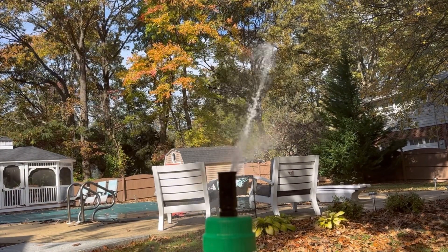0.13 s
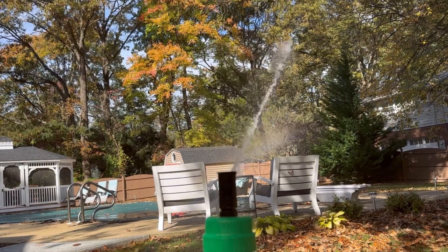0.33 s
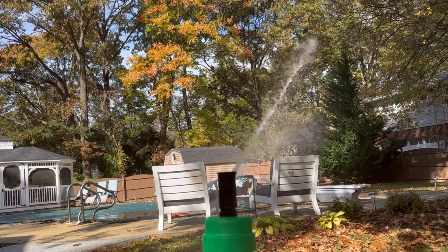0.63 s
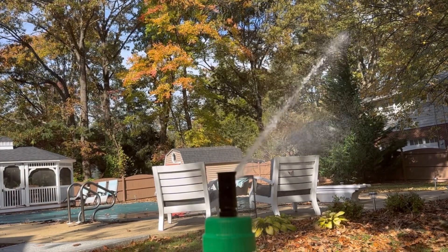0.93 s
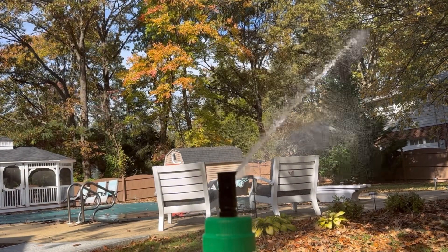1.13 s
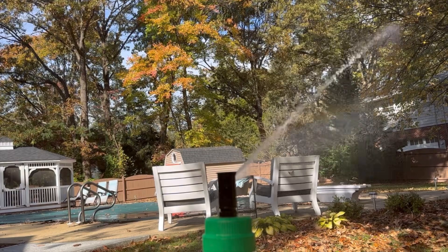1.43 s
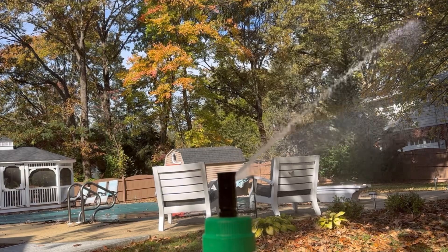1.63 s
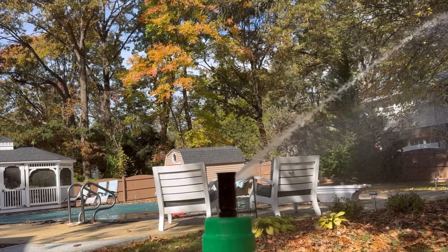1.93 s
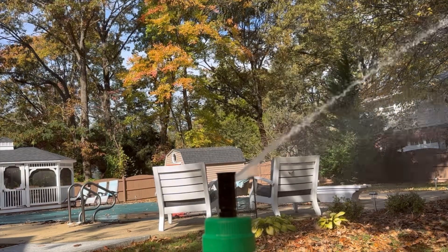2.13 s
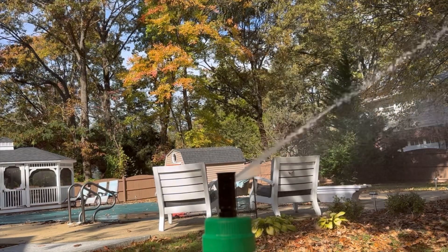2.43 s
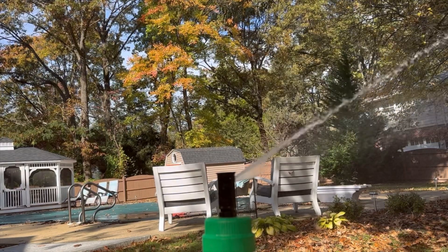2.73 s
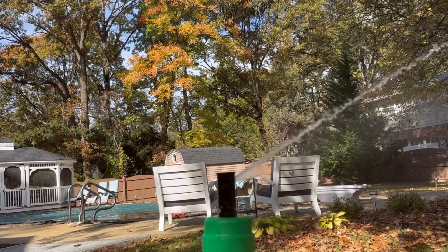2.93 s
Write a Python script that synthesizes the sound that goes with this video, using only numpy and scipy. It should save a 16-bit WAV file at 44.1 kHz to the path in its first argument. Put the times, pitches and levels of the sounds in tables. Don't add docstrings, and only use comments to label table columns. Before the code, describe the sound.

Close, steady sprinkler hiss with a fast fine throb fills an open yard, picked up in stereo by a phone; soft traffic wash fades early, a distant engine note drops midway, and leaf droplets tick more later.

```python
import sys
import numpy as np
from scipy import signal
from scipy.fft import rfft, irfft
from scipy.io import wavfile
from scipy.ndimage import uniform_filter1d

SR = 44100
rng = np.random.default_rng(int(sys.argv[2]) if len(sys.argv) > 2 else 0)


def file_out(sig):
    cols = np.atleast_2d(sig).T
    lim = np.clip(cols, -1, 1)
    pcm = np.round(lim * 32767).astype(np.int16)
    wavfile.write(sys.argv[1], SR, pcm)


def how_loud(loudness_db):
    steps = np.asarray(loudness_db, float) / 20
    return 10 ** steps


N = 135387

# [start_s, level_db]
ROAD_DB = [
    (0, 1.5),
    (.15, 0),
    (.6, -0.5),
    (1.05, 1),
    (1.3, -10.5),
    (1.9, -9),
    (3.07, -8.5),
]


def curve(table, col=1):
    points = np.array(table)
    return np.interp(np.arange(N) / SR, points[:, 0], points[:, col])


def bin_hz():
    return np.arange(N // 2 + 1) * SR / N


def over_hz(table):
    points = np.array(table)
    return np.interp(np.log(np.maximum(bin_hz(), 1)), np.log(points[:, 0]), points[:, 1])


def walk(rate_hz):
    hold = int(SR / rate_hz)
    steps = np.repeat(rng.standard_normal(N // hold + 1), hold)
    slewed = uniform_filter1d(uniform_filter1d(steps, hold), hold)
    return 1.31 * slewed[:N]


def ports(shared, own):
    # [freq_hz, likeness_0_to_1]
    likeness = [(60, 0.89), (300, 0.92), (800, 0.2), (2000, 0.84), (5000, 0.42), (6600, 0.59), (8000, 0.94),
                (14500, 0.53)]
    # [freq_hz, lead_rad]
    lead = [(2000, 0.5), (3600, 1.9), (5200, 1.08), (6650, 0.76), (8170, 3), (10400, 0.5), (13600, 1.7),
            (16000, -4.5)]
    # [freq_hz, tilt_db]
    tilt = [(60, 4.5), (600, 0.3), (1500, .5), (2400, -2.5), (3300, -0.5), (4800, 4), (7800, 3), (10000, 0)]
    common = np.clip(over_hz(likeness), 0, 1)
    half = how_loud(over_hz(tilt) / 2) * np.exp(0.5j * over_hz(lead))
    mixed = np.sqrt(common) * rfft(shared) + np.sqrt(1 - common) * rfft(own)
    return mixed * np.array([half, 1 / half])


def patter(share):
    drops_per_s, spread_db, cap_db, drop_s = 350, 1.5, 11, 0.00065
    chance, luck = rng.random((2, N))
    drop_db = np.minimum(-spread_db * np.log(luck + 1e-9), cap_db)
    hits = (chance < drops_per_s / SR) * how_loud(drop_db)
    grains = signal.lfilter([1], [1, -np.exp(-1 / (drop_s * SR))], hits)
    return np.sqrt(1 - share + share * grains ** 2 / np.mean(grains ** 2))


def wash(spectrum, shared_db, flicker_db, rate_hz, broad=0, pitched=0, count=2):
    # [freq_hz, width_hz, boost_db]
    nozzle = [(1320, 50, 1), (2460, 58, 2), (3374, 210, 5.5), (4250, 150, 3), (5270, 190, 5),
              (9350, 430, 2)]
    hz = bin_hz()
    white = rng.standard_normal((3, N))
    if broad:
        white = white * patter(broad)
    ring_db = sum(db / (1 + (2 * (hz - f) / width) ** 2) for f, width, db in nozzle)
    inside = (hz > spectrum[0][0]) & (hz < spectrum[-1][0])
    coloured = ports(white[0], white[1:]) * how_loud(over_hz(spectrum) + ring_db) * np.sqrt(SR / 2) * inside
    place = count * np.log2(np.maximum(hz, 1) / spectrum[0][0])
    out = 0
    for k in range(int(place[inside].max()) + 2):
        band = np.cos(np.pi / 2 * np.clip(place - k, -1, 1)) ** 2
        part = irfft(coloured * band, N) * how_loud(shared_db + flicker_db * walk(rate_hz))
        if pitched:
            part = part * patter(pitched)
        out = out + part
    return out


def sprinkler():
    # [freq_hz, density_db_per_hz]
    jet_colour = [(1500, -100), (2900, -94.5), (3700, -92.5), (4300, -92.5), (5000, -95), (6000, -94.5),
                  (6700, -99), (8700, -100)]
    # [freq_hz, density_db_per_hz]
    spray_colour = [(6600, -104), (7550, -91.5), (9100, -87.5), (9800, -92), (11000, -89.5), (13500, -92.5),
                    (14500, -95.5), (16000, -91.5)]
    # [start_s, level_db, left_lead_samples]
    swing = [(0, 0, .04), (.3, 0, .02), (.45, -.5, 0.12), (.6, 0, 0.01), (.75, 0, .14), (1.0, -0.5, .03),
             (1.2, .2, 0.079), (1.4, 0.4, -0.11), (1.7, -0.5, -0.085), (2.3, 0.04, -0.07), (2.7, 1, -0.079),
             (3.07, 1.5, -0.11)]
    turbine_hz, throb_depth_db = 65.8, 1.27
    turn = 2 * np.pi * np.cumsum(turbine_hz * (1 + 0.0022 * walk(4.6))) / SR
    throb = throb_depth_db * (np.sin(turn) + 0.36 * np.sin(2 * turn))
    gust, flutter = walk(7.3), walk(25.13)
    swing_db = curve(swing)
    jet_db = 1.65 * swing_db + 0.63 * throb + 0.3 * gust + 0.55 * flutter
    spray_db = swing_db + throb + 0.098 * gust + 0.17 * flutter
    jet = wash(jet_colour, jet_db, 0.4, 14, broad=0.026, pitched=0.1)
    spray = wash(spray_colour, spray_db, 0.52, 20, broad=0.1, pitched=0.2, count=4)
    both = jet + spray
    drift = curve(swing, col=2) + 0.03 * walk(13)
    return both + np.array([[1], [-1]]) * drift * np.gradient(both, axis=1) / 2


def splashes():
    # [start_s, peak_db, low_hz, high_hz, length_s]
    hits = [(.0149, -51, 9000, 13000, .002), (.0742, -51, 9000, 13000, .002),
            (.1336, -52, 4000, 13000, .003), (.3882, -53, 4000, 13000, .003),
            (.403, -48, 8300, 10500, .002), (.5232, -52, 3500, 13000, .003), (1.3578, -46, 700, 2500, .003),
            (1.3578, -49, 2500, 7500, .002), (1.4396, -51, 8300, 10500, .002),
            (1.8647, -47, 8500, 12000, .002), (1.9325, -48, 1200, 6500, .0025),
            (1.9335, -47, 8300, 13000, .004), (2.1246, -46, 7500, 13000, .004),
            (2.172, -48, 8500, 12000, .002), (2.1894, -48, 9000, 12500, .002),
            (2.3615, -49, 5000, 13000, .003), (2.5292, -49, 9000, 12000, .002),
            (2.6329, -49, 8300, 10500, .002), (2.668, -49, 11000, 13500, .004),
            (2.677, -44, 8500, 13000, .004), (2.686, -49, 10500, 13000, .004),
            (2.7297, -49, 6000, 11500, .003), (2.9632, -51, 1500, 8000, .002)]
    out = np.zeros((3, N))
    crack = 4.0 * (np.arange(1000) == 8)
    for at, db, low_hz, high_hz, length_s in hits:
        start = int(at * SR)
        age = np.arange(1000) / SR / length_s
        fizz = rng.standard_normal((3, 1000)) * np.minimum(age * 6, 1) * np.exp(-age)
        sos = signal.butter(2, [low_hz, high_hz], "band", fs=SR, output="sos")
        burst = signal.sosfilt(sos, fizz + crack)
        peak_rms = np.sqrt(np.mean(burst[:, age < 1] ** 2, axis=1, keepdims=True))
        out[:, start:start + 1000] += how_loud(db) * burst / peak_rms
    return irfft(ports(out[0], out[1:]), N)


def drone(hz, db, wobble, rough_db):
    phase = 2 * np.pi * np.cumsum(hz * (1 + wobble * walk(8.83))) / SR
    return np.sqrt(2) * np.sin(phase) * how_loud(db + rough_db * walk(15))


def truck():
    # [start_s, firing_hz, level_db]
    pull = [(0, 121.8, -45.5), (.17, 119.8, -47.5), (.22, 122, -59), (.29, 121.9, -58), (.36, 122.6, -45.5),
            (.62, 124.7, -38.5), (.85, 126.2, -40), (1.05, 127, -39.5), (1.66, 127.1, -39.5),
            (1.73, 122.2, -42.5), (1.77, 118, -41.5), (1.81, 109.6, -43), (1.855, 106, -36),
            (1.92, 101.1, -43), (1.98, 97.75, -33), (2.15, 97.8, -37.5), (2.29, 98.5, -50),
            (2.43, 98.9, -44), (2.53, 98.6, -48), (2.62, 99.8, -36), (2.8, 100.4, -59.5), (2.93, 99.5, -39),
            (3.07, 101, -76)]
    note = drone(curve(pull), curve(pull, col=2), 0.003, 0.8)
    return note * how_loud([[-0.3], [0.3]])


def compressor():
    # [start_s, level_db]
    hum_db = [(0.0, -39.5), (.12, -42.5), (.5, -44.5), (.58, -39.5), (0.85, -37.5), (.95, -45), (.99, -56),
              (1.03, -37), (1.14, -40), (1.24, -51), (1.32, -42), (1.38, -66), (1.46, -46), (1.56, -52),
              (1.61, -48), (1.68, -57), (1.73, -44), (1.85, -42), (2.22, -37.5), (2.29, -41.5), (2.43, -37),
              (2.5, -45), (2.62, -46), (2.77, -55), (2.86, -52), (2.94, -41.5), (2.98, -47), (3.07, -42)]
    hum_hz = 61.04
    hum = drone(hum_hz, curve(hum_db), 0.002, 0.7)
    fourth = drone(4 * hum_hz, -63 + 0.12 * curve(ROAD_DB), 0.012, 2.5)
    return (hum + fourth) * how_loud([[0.2], [-0.2]])


def road():
    # [freq_hz, density_db_per_hz]
    road_colour = [(140, -90), (260, -75), (400, -85.5), (800, -83.5), (1100, -90)]
    return wash(road_colour, curve(ROAD_DB), 2.2, 5)


def yard():
    # [freq_hz, density_db_per_hz]
    yard_colour = [(25, -85), (55, -63), (150, -71), (220, -81), (1000, -83.5), (1400, -81), (2300, -88),
                   (3200, -99)]
    return wash(yard_colour, 0.3 * walk(1.5), 1.3, 4.5)


def scene():
    return sprinkler() + splashes() + truck() + compressor() + road() + yard()


def top_cut(x):
    return signal.sosfilt(signal.butter(12, 16180, fs=SR, output="sos"), x)


def record(dry):
    mono_low_hz, mono_high_hz, edge_hz, top_hz = 10350, 13750, 600, 15750
    spec, hz = rfft(dry), bin_hz()
    narrowing = np.clip((mono_low_hz - hz) / edge_hz, 0, 1) ** 0.36
    width = np.where(hz > mono_high_hz, 1, narrowing)
    middle = spec.mean(axis=0)
    spec = (middle + width * (spec - middle)) * (hz < top_hz)
    return top_cut(irfft(spec, N))


dry = scene()
out = record(dry)
file_out(out)
```